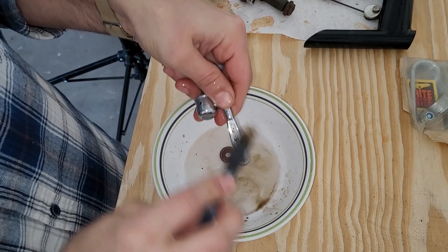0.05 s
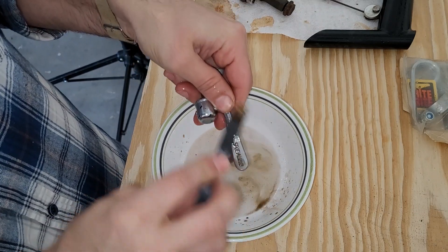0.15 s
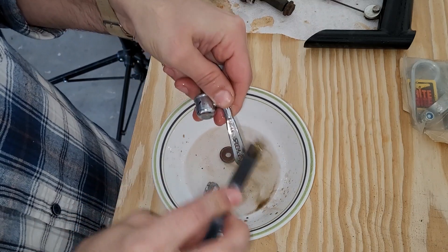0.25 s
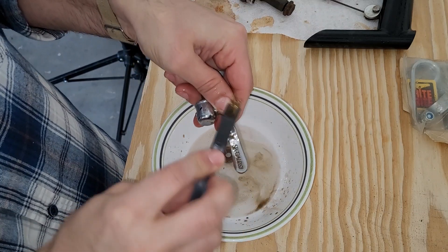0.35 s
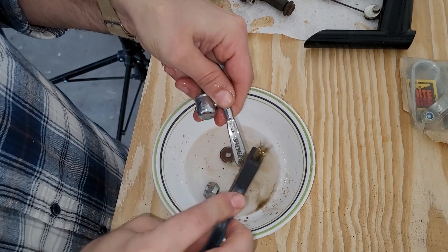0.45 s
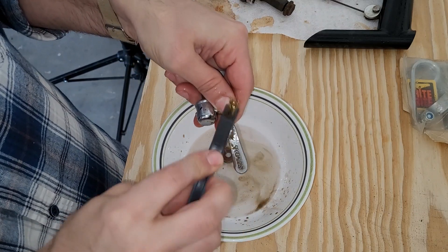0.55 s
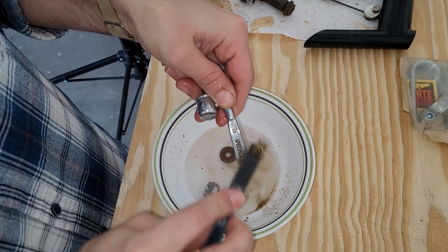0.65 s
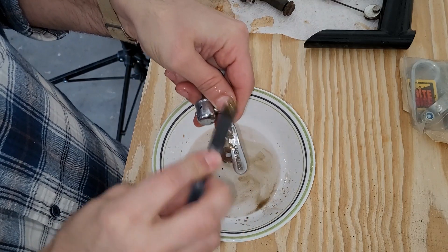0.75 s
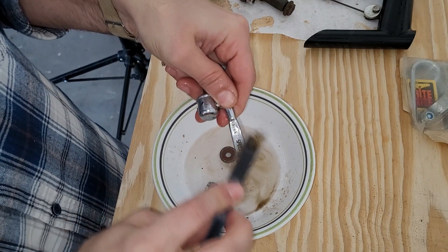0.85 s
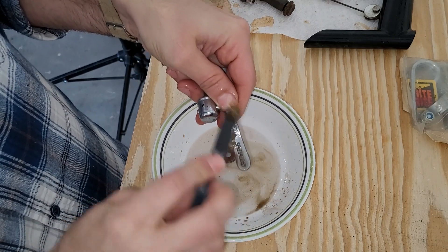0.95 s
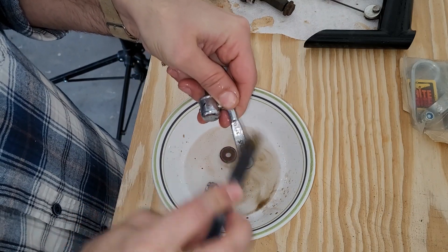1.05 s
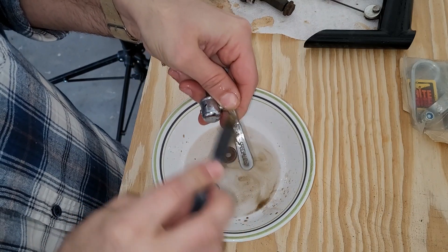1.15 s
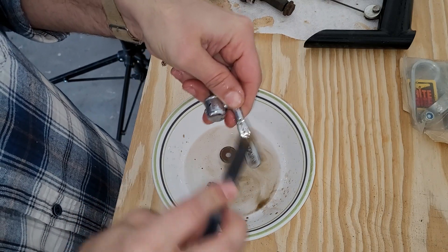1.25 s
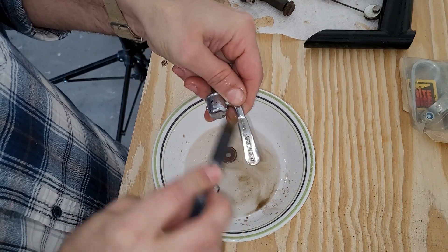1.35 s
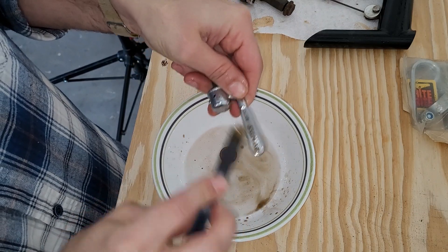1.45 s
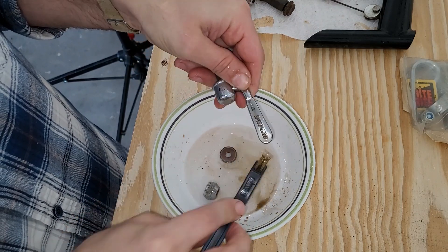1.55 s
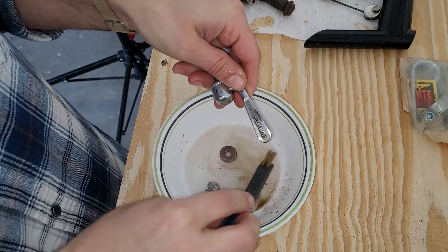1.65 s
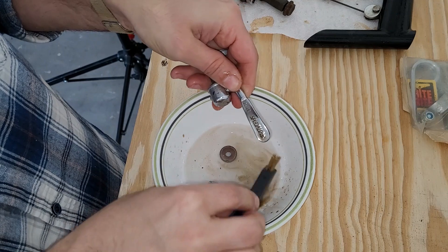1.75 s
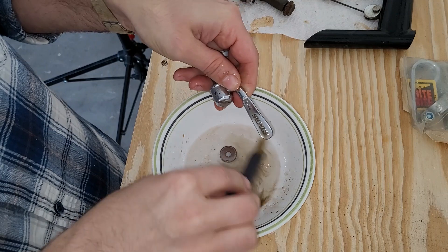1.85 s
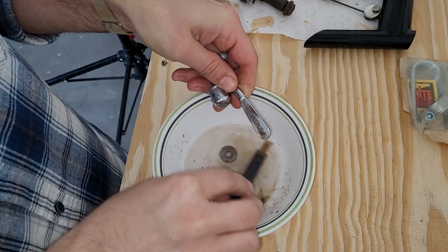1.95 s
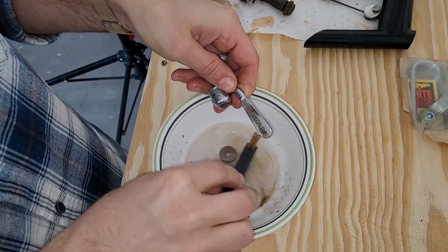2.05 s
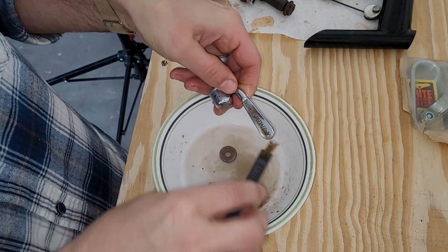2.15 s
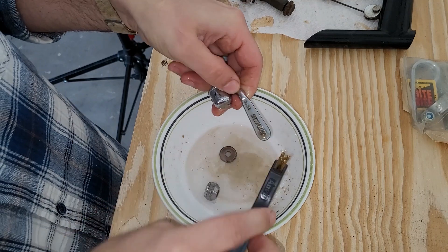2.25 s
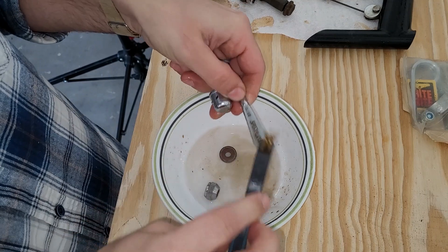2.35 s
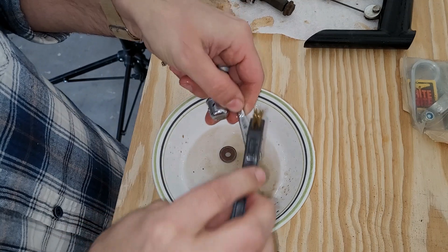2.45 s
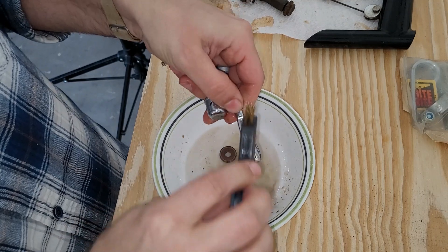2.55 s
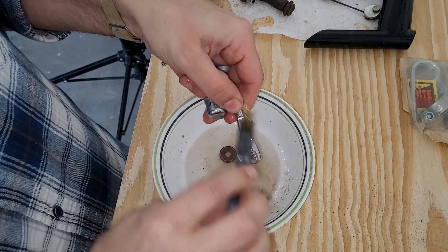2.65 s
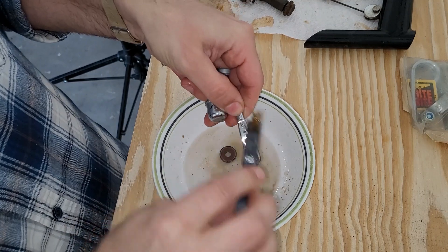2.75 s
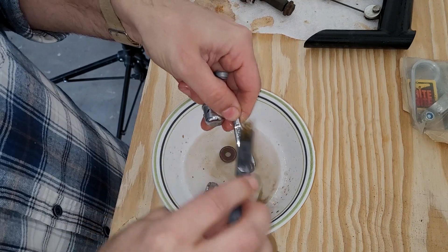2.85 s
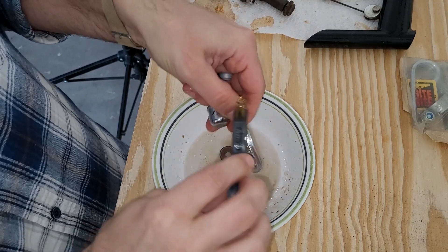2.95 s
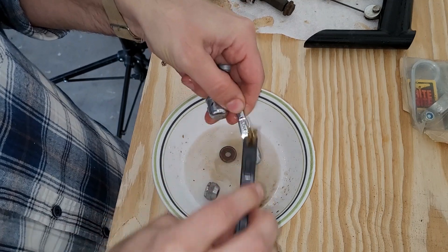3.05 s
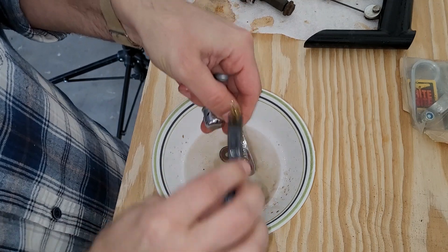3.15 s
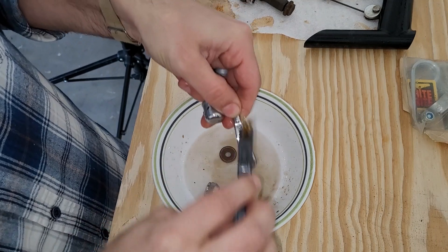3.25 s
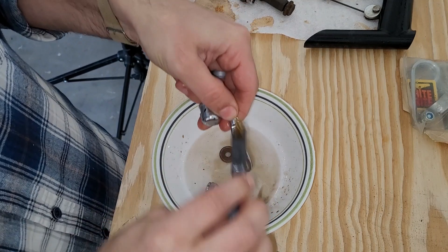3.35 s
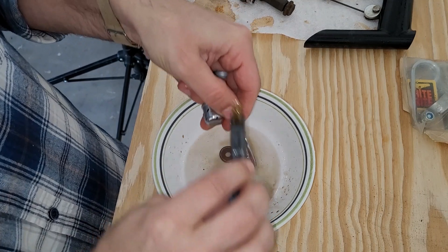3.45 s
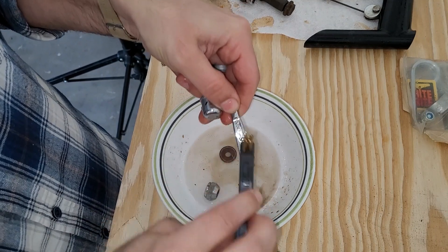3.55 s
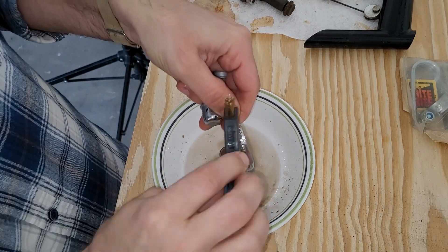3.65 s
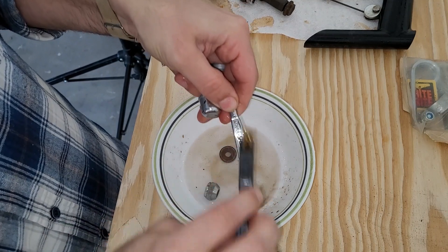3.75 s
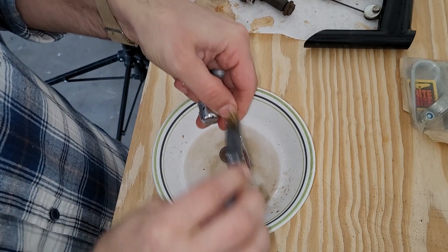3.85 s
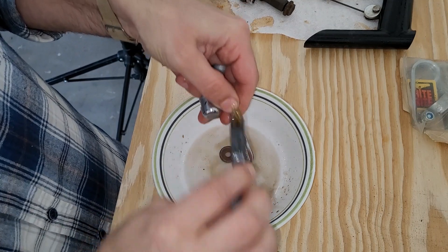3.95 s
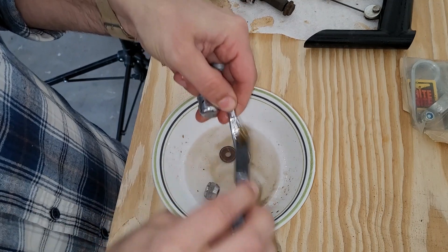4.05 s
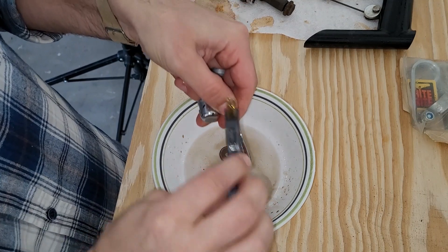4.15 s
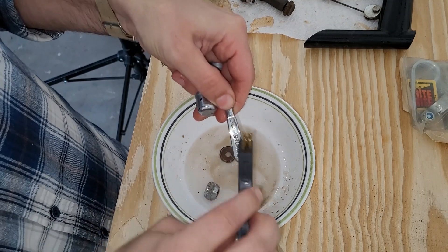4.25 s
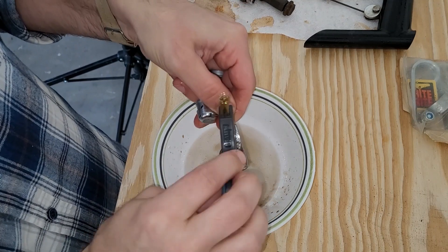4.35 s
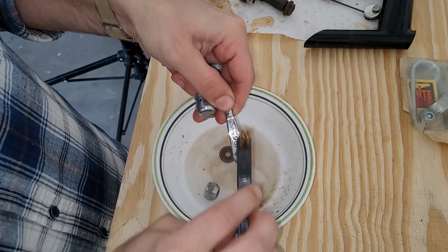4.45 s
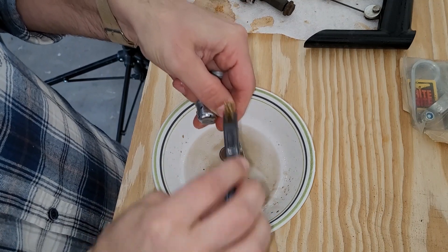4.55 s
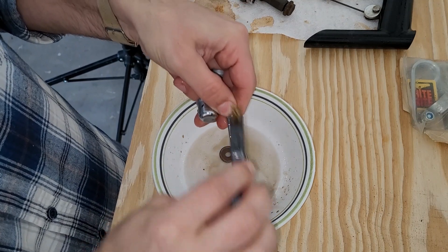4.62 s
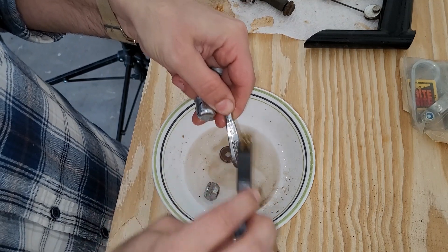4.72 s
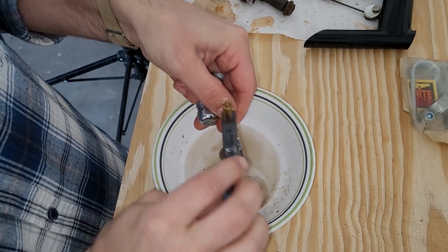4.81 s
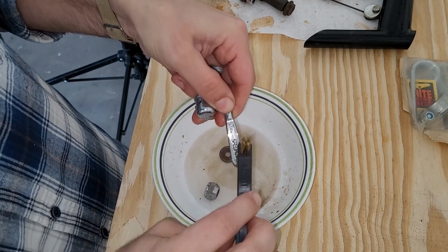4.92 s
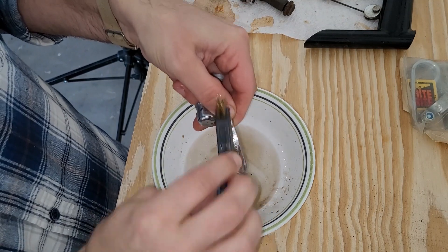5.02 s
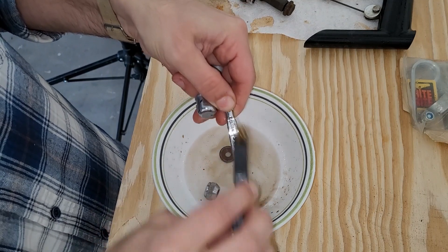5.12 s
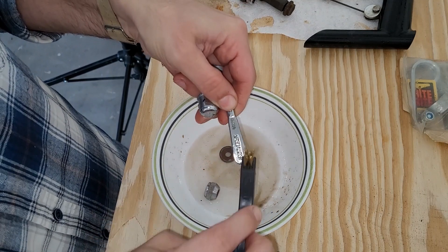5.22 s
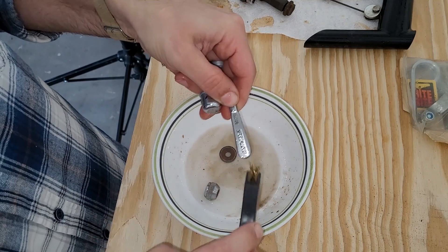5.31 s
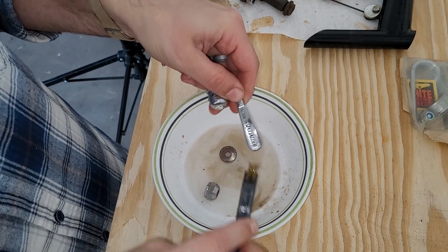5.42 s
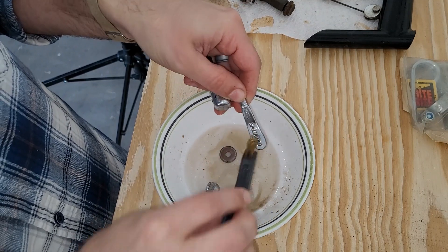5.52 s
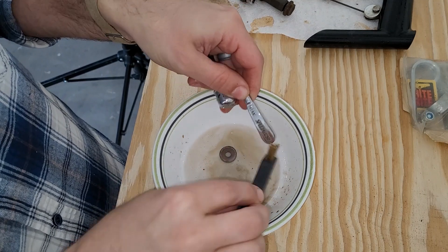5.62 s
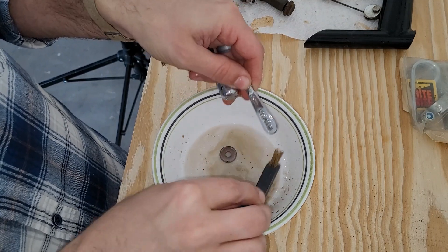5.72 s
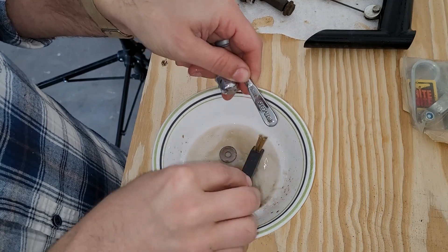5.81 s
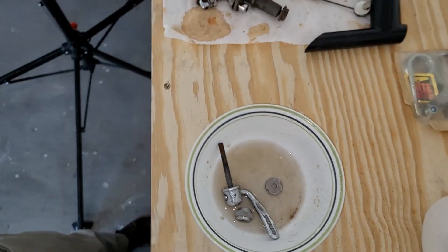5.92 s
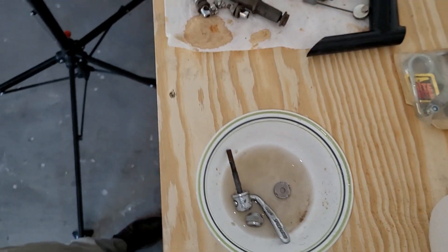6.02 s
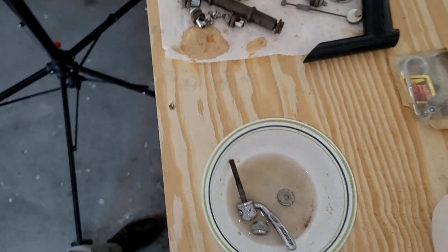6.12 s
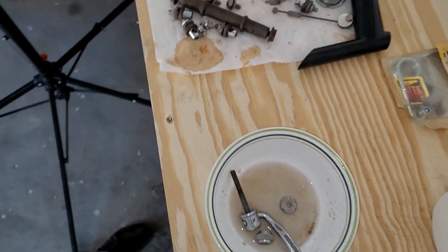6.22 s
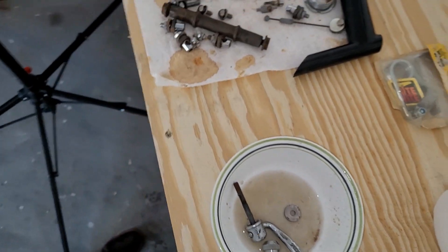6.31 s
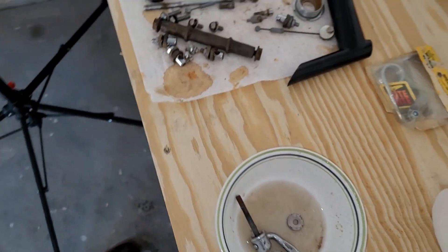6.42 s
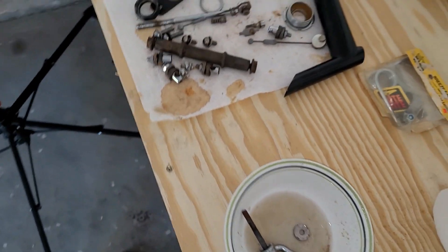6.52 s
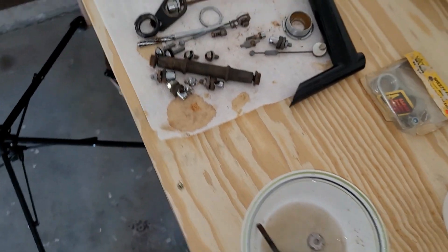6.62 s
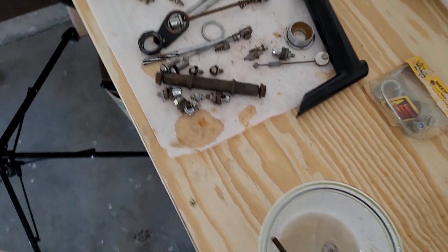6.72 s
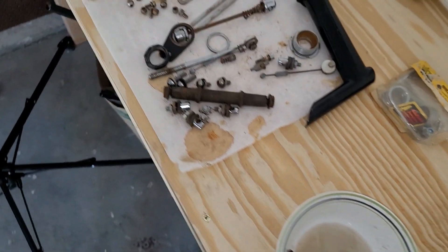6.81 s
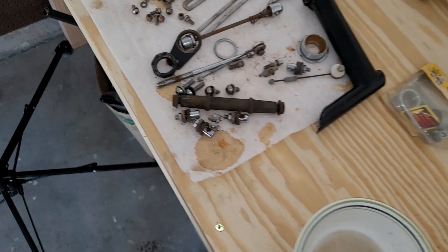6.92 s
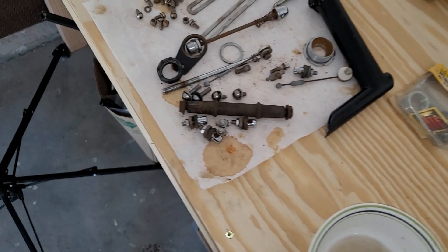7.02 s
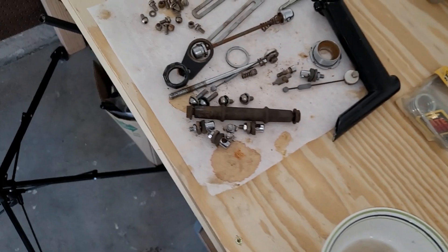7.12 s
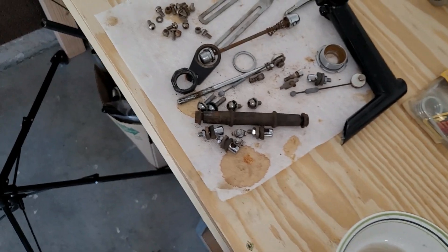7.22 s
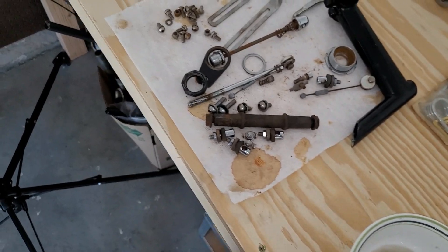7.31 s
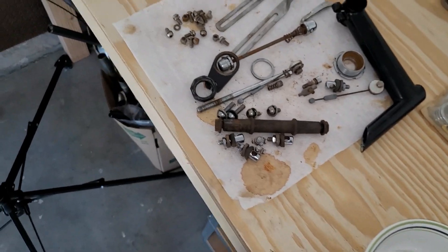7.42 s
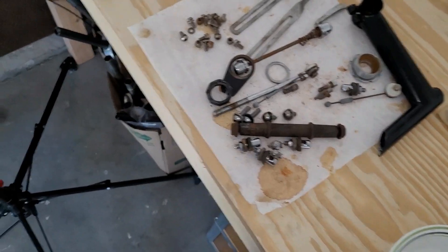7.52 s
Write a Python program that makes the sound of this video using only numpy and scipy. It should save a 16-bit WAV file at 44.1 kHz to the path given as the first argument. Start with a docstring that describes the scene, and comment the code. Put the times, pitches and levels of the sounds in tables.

```python
"""Scrubbing a wet lever over a china bowl

Two microphones close to a wooden workbench: a stiff brush scrubs a wet metal lever, noise grains through modes.
Two runs of quick strokes, with a dip of swishes and ringing china between; now and then the lever sings.
The brush goes down with a knock of ringing modes, a blow on metal clanks further off, a sleeve rustles as
grains of cloth noise. Fan air, shaped noise with wavering tones, runs throughout over a low hum that comes and goes.
"""
import sys
import numpy as np
from scipy import signal
from scipy.fft import rfft, irfft, next_fast_len
from scipy.io import wavfile

SR = 44100
rng = np.random.default_rng(int(sys.argv[2]) if len(sys.argv) > 2 else 0)


def master_out(mix):
    """Clip the mix to full scale and print it as 16-bit PCM to the path in sys.argv[1]."""
    frames = np.transpose(np.atleast_2d(mix))
    ceiling = np.clip(frames, -1, 1)
    pcm = np.round(ceiling * 32767).astype(np.int16)
    wavfile.write(sys.argv[1], SR, pcm)


N = 333835
TIME = np.arange(N) / SR

# All spectra and mode levels are relative; sources set their own loudness.
# fan and room air, spectrum: (frequency [Hz], density [dB])
AIR_SPECTRUM = [(40, -4), (130, -3), (190, -4), (270, -1), (450, 0), (650, -2.5), (900, 0.5), (1300, -11),
                (1800, -23), (2600, -36.5), (5000, -36.5), (16000, -34.5)]
# course of the fan and room air: (time [s], relative level [dB])
AIR_LEVEL = [(0.0, -60.5), (1.03, -60), (2.32, -65), (2.8, -60.5), (5.23, -58.5), (5.78, -60.5),
             (5.9, -64.5), (7.57, -61)]
# tones of the fan: (frequency [Hz], level against the air [dB])
FAN_TONES = [(267, -12), (335, -27), (355, -20.5), (451, -17), (562, -13), (688, -22.5), (1042, -22.5),
             (1125, -22)]
# partials of the low hum: (centre frequency [Hz], mean level [dB])
HUM_PARTIALS = [(69, 0), (138, -11), (213, -8), (284, -14)]
# when the hum is heard: (start [s], end [s], level [dB])
HUM_SPELLS = [(-.1, 0.786, -54.5), (0.777, 1.35, -66), (1.38, 2.0, -59), (5.2, 5.92, -62)]
# trembling of the bench, spectrum: (frequency [Hz], density [dB])
RUMBLE_SPECTRUM = [(20, -28), (30, -18), (46, -2), (62, 2), (75, -3.5), (96, -8.5), (134, -3.5), (175, -22),
                   (250, -42), (420, -90)]
# sleeve and fingers shifting: (time [s], relative level [dB], half length [s], treble [dB])
RUSTLES = [(5.38, -90, .15, 2.5), (5.642, -73.5, 0.027, 9), (6.555, -65, 0.046, 5),
           (6.734, -73, 0.099, 6.5), (6.933, -65.5, 0.1, -8), (7.311, -64.5, 0.018, -10),
           (7.425, -62, 0.034, -13), (7.532, -64.5, 0.046, -19)]
# cloth fibres, spectrum: (frequency [Hz], density [dB])
CLOTH_SPECTRUM = [(1200, -12), (2000, 1), (2600, -7), (3800, -6), (4800, -0.5), (6000, -5), (7700, -2),
                  (12200, -3.5), (16000, -8)]
# brief soft scuff, spectrum: (frequency [Hz], density [dB])
SCUFF_SPECTRUM = [(700, -14), (1500, 5), (2000, 4), (2600, -5), (3250, 5), (3900, -7), (4550, -3),
                  (5300, -9), (16000, -29)]
# modes of the clank across the workshop: (frequency [Hz], level [dB], decay by 60 dB [s])
CLANK_MODES = [(1542, -6, 0.46), (1560, -4, 0.26), (1790, 0, 0.31), (1860, 0, 0.19), (1970, 0, 0.36),
               (3090, 2, 0.26), (3300, -4, 0.29), (3980, -4, .25), (4530, -14, 0.26), (6000, -7, .3)]
# blurred burst of the clank, spectrum: (frequency [Hz], density [dB])
CLANK_SPECTRUM = [(700, -4), (1000, -8), (1300, -2.5), (1750, 3), (2000, 0.5), (2600, -10), (3250, -2.5),
                  (3700, -7.5), (6000, -9.5), (9000, -13.5), (16000, -21)]
# handle bouncing on the bench, then soft nudges: (time [s], click level [dB])
KNOCKS = [(5.7935, -29), (5.8005, -25), (5.8155, -30), (5.8272, -32.5), (5.842, -41), (5.868, -43),
          (5.885, -45), (5.9237, -43), (6.38, -46.5), (6.43, -44), (6.448, -46)]
# modes of the bench: (frequency [Hz], level [dB], decay by 60 dB [s])
BENCH_MODES = [(113, -15, 0.25), (229, -19, .06), (283, -8, .055), (342, -1, .026), (455, -17, .12),
               (600, -17, .03), (824, -18, .07)]
# handle clattering as it settles: (time [s], click level [dB])
CLATTER = [(5.795, -52), (5.808, -50), (5.8184, -49), (5.833, -49), (5.9237, -65)]
# modes of the handle: (frequency [Hz], level [dB], decay by 60 dB [s])
HANDLE_MODES = [(2120, -11, 0.028), (3510, -7.5, .05), (3770, -8, .04), (4650, -10, .03), (6500, -2, .02),
                (8700, 1, .015)]
# wet bristles swept through the bowl: (time [s], swish [dB], bowl rumble [dB], half length of the fall [s])
SWEEPS = [(1.826, -67.5, -53.5, 0.019), (1.899, -50.5, -55.5, 0.026), (2.005, -53, -49, 0.023),
          (2.071, -49, -45, 0.017)]
# swish of wet bristles, spectrum: (frequency [Hz], density [dB])
SWISH_SPECTRUM = [(880, 1), (1500, -3), (2160, -6), (2800, -20), (3690, -0.5), (5170, -5), (6000, -2),
                  (7170, -1.5), (8830, 1.5), (9560, -6.5), (12000, -2), (13400, -5), (16000, -4)]
# dull body of the bowl, and of the bench as the brush lands, spectrum: (frequency [Hz], density [dB])
BODY_SPECTRUM = [(120, -14), (220, 0.5), (290, 6), (380, -1), (470, -6), (700, -13), (1500, -30)]
# modes of the china: (frequency [Hz], width [Hz], level [dB])
CHINA_MODES = [(1775, 18, -21), (4300, 40, -18), (9000, 220, -8.5), (10200, 100, -10), (10780, 130, -5.5),
               (12250, 260, -5), (15700, 190, -15)]
# tufts snapping over an edge: (time [s], relative level [dB])
SNAPS = [(.078, -44), (.1624, -41.5), (.3774, -43), (.524, -42), (1.238, -43.5), (1.38, -41), (1.868, -52),
         (1.886, -51), (1.918, -53), (2.0552, -44), (2.669, -41), (2.9834, -46.5), (3.14, -41),
         (3.608, -41), (4.315, -40), (4.534, -46), (4.996, -42), (5.658, -51.5)]
# bristles catching so that the lever sings: (time [s], relative level [dB], half length [s], frequency [Hz])
SQUEALS = [(1.11, -60, .035, 2720), (1.17, -74, .02, 2525), (1.68, -87, .05, 3120), (1.66, -89, .02, 4900),
           (3.766, -56, 0.021, 2737), (5.28, -74.5, .05, 3164), (5.532, -84, .05, 3210)]
# bristles on the lever, spectrum: (frequency [Hz], density [dB])
BRISTLE_SPECTRUM = [(900, -19), (1700, -39), (2400, -32), (3000, -32), (3500, -37), (4200, -5.5),
                    (5200, -3.5), (7200, -0.5), (9000, -3), (11400, 1.5), (14000, 1), (15500, 4),
                    (16500, 9.5)]
# modes of the lever: (frequency [Hz], width [Hz], level [dB])
LEVER_MODES = [(1484, 170, -38), (2120, 38, -31), (2543, 35, -38), (2735, 26, -31), (2910, 36, -35),
               (3168, 55, -33), (3890, 53, -28), (4920, 73, -25.5), (5390, 120, -22), (6570, 110, -36),
               (6900, 42, -27.5), (7210, 150, -23.5), (8120, 64, -21), (11540, 300, -21.5),
               (12050, 100, -21), (15600, 300, -19)]
# how freely the lever rings under the changing grip: (time [s], level [dB])
GRIP = [(0, -4), (1.3, 4), (2.5, 0.5)]
# brush on the lever: (touches [s], leaves [s])
BOUTS = [(-0.19, 1.41), (2.6, 5.354)]
# pushes, the bristles break loose at once: (start [s], end [s], relative level [dB], brightness [dB])
PUSHES = [(0.079, 0.137, -35, 2.5), (0.305, 0.356, -37.0, 3.5), (0.524, 0.578, -37, -0.5),
          (0.733, 0.79, -37, 1), (0.939, 0.996, -38.0, 2.5), (1.147, 1.201, -40, 4),
          (1.358, 1.388, -44.5, 1), (2.492, 2.553, -55, -3), (2.67, 2.728, -41.5, 1),
          (2.885, 2.945, -41.5, -1.5), (3.146, 3.192, -36.5, 4), (3.369, 3.436, -38, 1),
          (3.607, 3.667, -37.5, 0), (3.851, 3.91, -36, 2), (4.085, 4.149, -35, 4), (4.317, 4.371, -35, 2.0),
          (4.539, 4.598, -35.0, 0.5), (4.771, 4.827, -35.5, -0.5), (4.991, 5.052, -34.5, 0.5)]
# pulls, the bristles ease into the slide: (start [s], end [s], relative level [dB], brightness [dB])
PULLS = [(-0.03, 0.028, -36.5, 8.5), (0.215, 0.25, -36.5, 7), (0.433, 0.469, -36, 6),
         (0.662, 0.678, -34, 10), (0.859, 0.901, -39.5, 7), (1.058, 1.109, -38, 5), (1.259, 1.304, -41, 4),
         (2.589, 2.635, -43, 2.5), (2.767, 2.834, -44.0, 1.5), (3.036, 3.097, -39.5, 5.5),
         (3.266, 3.327, -37, 3), (3.499, 3.566, -37.5, 3.5), (3.741, 3.804, -37, 2.5), (3.99, 4.04, -37, 2),
         (4.213, 4.265, -37, 1.0), (4.435, 4.489, -35.5, 1.5), (4.657, 4.719, -36.5, 2.5),
         (4.886, 4.944, -36, 3), (5.111, 5.181, -36, 1.5)]
# likeness of the two microphones: (frequency [Hz], correlation [-1 to 1])
LIKENESS = [(30, 0.99), (120, 0.75), (280, 0.71), (500, 0.44), (900, -0.25), (2300, -0.17), (5000, -0.21),
            (16000, -0.1)]
# balance of the two microphones: (frequency [Hz], left minus right [dB])
BALANCE = [(40, -6.5), (150, 1), (1000, 1), (2300, 3.5), (3200, 3), (4300, 4.5), (5600, 0), (7500, -1),
           (8700, 3.5), (10000, 2.5), (11700, 3), (16000, 1.5)]

CUTOFF_HZ = 15750
DIP_AT, DIP_HALF_S, DIP_DB = 5.969, .013, -24   # the level dips briefly as the work ends


def from_db(db):
    """Decibels to gain."""
    return 10 ** (np.asarray(db) / 20)


def rms_one(x):
    """Scale to unit power."""
    return x / np.sqrt(np.mean(x ** 2) + 1e-20)


def at_hz(points, hz):
    """Read a spectrum on a log-frequency axis."""
    frequency, value = np.transpose(points)
    return np.interp(np.log(hz + 1e-3), np.log(frequency), value)


def rfft_hz(size):
    """Frequency of each bin of a spectrum."""
    return np.arange(size // 2 + 1) * SR / size


def samples(start, end):
    """The stretch of samples between two times [s]."""
    return slice(max(0, int(start * SR)), max(0, int(end * SR)))


def drift(rate):
    """Smooth chance with rms 1, changing about rate times a second."""
    knots = rng.standard_normal(N)
    return rms_one(np.interp(TIME * min(rate, SR / 2), np.arange(N), knots))


def white():
    """Two unrelated noises."""
    return rng.standard_normal((2, N))


def colour(pair, spectrum):
    """Give two unrelated signals a spectrum and spread them over the two microphones; rms 1."""
    size = next_fast_len(N)
    hz = rfft_hz(size)
    mid, side = rfft(pair, size) * from_db(at_hz(spectrum, hz)) * (hz < CUTOFF_HZ) * (hz > 10)
    alike = np.clip(at_hz(LIKENESS, hz), -1, 1)
    sign = np.array([[1], [-1]])
    microphones = np.sqrt(1 + alike) * mid + sign * np.sqrt(1 - alike) * side
    balance = from_db(sign * at_hz(BALANCE, hz) / 2)
    return rms_one(irfft(microphones * balance, size)[:, :N])


def grains(per_s, spread_db):
    """Tiny slips of uneven size at random moments; each reaches the two sides differently."""
    born = rng.random(N) < per_s / SR
    size_db = spread_db * np.minimum(rng.exponential(1, N), 4)
    return rms_one(born * from_db(size_db) * white())


def resonate(x, hz, width_hz):
    """A resonance with gain 1 on top."""
    r = np.exp(-np.pi * width_hz / SR)
    feedback = [1, -2 * r * np.cos(2 * np.pi * hz / SR), r * r]
    return signal.lfilter(np.array([1, 0, -1]) * (1 - r * r) / 2, feedback, x)


def narrow_noise(hz, width_hz, skirt_hz):
    """A rough tone: noise through two resonances at one pitch; rms 1."""
    return rms_one(resonate(resonate(white(), hz, width_hz), hz, skirt_hz))


def split_treble(x, split_hz):
    """Part a sound into its dull share and the treble that is left."""
    dull = signal.sosfiltfilt(signal.butter(2, split_hz, fs=SR, output="sos"), x)
    return dull, x - dull


def ring(clicks, modes):
    """A unit click sets each mode ringing at its own height."""
    out = 0
    for hz, db, t60 in modes:
        r, w = from_db(-60 / (t60 * SR)), 2 * np.pi * hz / SR
        feedback = [1, -2 * r * np.cos(w), r * r]
        # the tiny offset keeps the filter clear of denormal numbers
        out = out + from_db(db) * signal.lfilter([0, np.sin(w)], feedback, clicks + 1e-18)
    return out


def sing(force, modes, wander_db, shift_hz, move_rate=14):
    """Modes driven by a rubbing force; each mode wavers at random in pitch and strength."""
    out = 0
    for hz, width, db in modes:
        coupling = from_db(wander_db * np.minimum(drift(move_rate), 1))
        tone = from_db(db) * np.sqrt(SR / np.pi / width) * resonate(force * coupling, hz, width)
        bent = TIME + shift_hz / hz / move_rate / np.sqrt(2) * drift(move_rate)
        out = out + np.array([np.interp(bent, TIME, side) for side in tone])
    return out


def swell(s, rise, fall, squareness=2.46):
    """Gain of one push of the hand: it speeds up, peaks at s and slows down."""
    out, near = np.zeros(N), samples(s - 4 * rise, s + 4 * fall)
    lag = TIME[near] - s
    out[near] = np.exp(-np.abs(lag / np.where(lag < 0, rise, fall)) ** squareness / 2)
    return out


def burst(s, rise, t60):
    """Gain that jumps up at s and dies away."""
    age = np.maximum(TIME - s, 0)
    return (1 - np.exp(-age / rise)) * np.exp(-np.minimum(np.log(1000) * age / t60, 50))


def spell(start, end, fade_s=0.052):
    """Gain that fades in at start and out at end."""
    return np.clip(np.minimum(TIME - start, end - TIME) / fade_s + .5, 0, 1)


def level_curve(rows):
    """A curve of (time [s], level [dB]) as a gain."""
    return from_db(np.interp(TIME, *np.transpose(rows)))


def clicks_at(rows):
    """One click for each (time [s], level [dB])."""
    clicks = np.zeros(N)
    for s, db in rows:
        clicks[round(s * SR)] = from_db(db)
    return clicks


def flicker(x, patch_db=1.8, patch_rate=70, count=7):
    """Bands of the hiss flicker independently, so the colour shifts within a stroke."""
    size = next_fast_len(N)
    spectrum = rfft(x, size)
    place = np.interp(rfft_hz(size), [4000, 15500], [0, count - 1])
    out = 0
    for k in range(count):   # overlapping bands
        band = irfft(spectrum * np.maximum(1 - np.abs(place - k), 0), size)[:, :N]
        out = out + band * from_db(patch_db * drift(patch_rate))
    return rms_one(out)


def strokes():
    """Each stroke as (middle [s], gain through time, brightness [dB]): quick rise, hold, release."""
    release_s = .009
    for rows, attack_s in ((PUSHES, .006), (PULLS, .0085)):
        for start, end, db, bright_db in rows:
            gain, near = np.zeros(N), samples(start - .1, end + .1)
            rise = 1 + np.exp((start - TIME[near]) / attack_s)
            release = 1 + np.exp((TIME[near] - end) / release_s)
            gain[near] = from_db(db) / rise / release
            yield (start + end) / 2, gain, bright_db


def workshop(x, t60=0.43, treble_t60=0.26, split_hz=7000):
    """Diffuse room tail, other on each side; the treble dies sooner."""
    age = TIME[:SR]
    noise = rng.standard_normal((2, SR))
    dull = signal.sosfilt(signal.butter(2, split_hz, fs=SR, output="sos"), noise)
    tail = dull * 1000 ** (-age / t60) + (noise - dull) * 1000 ** (-age / treble_t60)
    tail = tail * (age > .005)
    return signal.fftconvolve(x, tail / np.sqrt(np.sum(tail ** 2) / 2), axes=1)[:, :N]


def background(air_db=4.5, tone_width_hz=8, hum_waver_hz=1.184, lift_db=1.0):
    """Fan air with wavering tones, quieter just after the work ends, then slowly rising again, and a low hum."""
    tones = sum(from_db(db) * narrow_noise(hz, tone_width_hz, 120) for hz, db in FAN_TONES)
    air_gain = level_curve(AIR_LEVEL) * from_db(air_db + lift_db * (TIME > DIP_AT))
    air = air_gain * (colour(white(), AIR_SPECTRUM) + tones)
    hum = 0
    for hz, db in HUM_PARTIALS:
        level = from_db(db + 2 * drift(6))
        hum = hum + level * np.sin(2 * np.pi * np.cumsum(hz + hum_waver_hz * drift(6)) / SR)
    return air + hum * sum(from_db(db) * spell(start, end) for start, end, db in HUM_SPELLS)


def tremble(re_stroke_db=-21.5, leaning_db=-63, still_db=-75.5, press_db=-54):
    """The bench rumbles under the working arms, more the harder they scrub, and swells as they once press down."""
    strength = level_curve(sorted((start, db) for start, _, db, _ in [*PUSHES, *PULLS]))
    effort = strength * sum(spell(touch, leave) for touch, leave in BOUTS)
    leaning = from_db(leaning_db) * (TIME < DIP_AT)
    press = from_db(press_db) * swell(3.71, 0.2, 0.2)
    power = (from_db(re_stroke_db) * effort) ** 2 + leaning ** 2 + from_db(still_db) ** 2 + press ** 2
    return np.sqrt(power) * colour(white(), RUMBLE_SPECTRUM)


def rustle(trim_db=1, split_hz=8000, scuff_db=-61):
    """Cloth fibres slide softly, with less treble in the later moves, and catch once."""
    dull, treble = split_treble(colour(grains(17000, 1.7), CLOTH_SPECTRUM), split_hz)
    slide = 0
    for s, db, half, treble_db in RUSTLES:
        move = from_db(db) * swell(s, half, half, squareness=1.67)
        slide = slide + move * (dull + from_db(treble_db) * treble)
    catch = swell(7.188, .01, .016, squareness=1.4)
    return from_db(trim_db) * slide + from_db(scuff_db) * catch * colour(white(), SCUFF_SPECTRUM)


def clank(at=6.231, level_db=-40, t60=0.18, modes_db=-17, tail_db=-11, tail_t60=0.92):
    """A far blow on metal, blurred by the room into a burst with a few lasting tones."""
    build_up_s = .009
    fade = burst(at, build_up_s, t60) + from_db(tail_db) * burst(at, 2 * build_up_s, tail_t60)
    blow = white() * burst(at, 0.0027, 0.065)
    tones = ring(blow / np.sqrt(np.sum(blow ** 2) / 2), CLANK_MODES)
    return from_db(level_db) * (fade * colour(white(), CLANK_SPECTRUM) + from_db(modes_db) * tones)


def put_down(low_hz=170, contact_hz=750):
    """The handle bounces dully on the bench and clatters to rest; later the bench is nudged."""
    contact = signal.butter(2, [low_hz, contact_hz], "band", fs=SR, output="sos")
    push = signal.sosfilt(contact, clicks_at(KNOCKS))
    return ring(clicks_at(CLATTER), HANDLE_MODES) - ring(push, BENCH_MODES)


def splay(at=5.822, level_db=-49, slide_db=-52, slide_t60=0.74, shudder_db=-48, shudder_t60=.13, drag_db=-47):
    """From the first knock on, the bristles splay and slide to rest while the bench shudders."""
    landing = KNOCKS[0][0]
    slide = burst(landing, .002, slide_t60) * (TIME < DIP_AT)
    spread = from_db(level_db) * swell(at, .02, 0.018) * (TIME > landing)
    swish = spread + from_db(slide_db) * slide
    shudder = from_db(shudder_db) * burst(landing, .002, shudder_t60) + from_db(drag_db) * slide
    return swish * colour(grains(7000, 1.7), SWISH_SPECTRUM) + shudder * colour(white(), BODY_SPECTRUM)


def sweeps(china_db=-2.5, wander_db=5.5, shift_hz=60, bowl_db=-3, rise_ratio=1.42):
    """Wet bristles swish and ring the china; the drag passes on to the bowl's body."""
    speed = sum(from_db(db) * swell(s, rise_ratio * half, half) for s, db, _, half in SWEEPS)
    drag = sum(from_db(db) * swell(s, rise_ratio * half, half) for s, _, db, half in SWEEPS)
    slips = grains(6500, 1.8) * from_db(1.2 * drift(150))
    first_touch = from_db(-60) * burst(1.751, 0.00091, 0.45)   # the bristles meet the china
    china = sing((speed + first_touch) * slips, CHINA_MODES, wander_db, shift_hz, move_rate=40)
    swish = speed * flicker(colour(slips, SWISH_SPECTRUM))
    return swish + from_db(china_db) * china + from_db(bowl_db) * drag * colour(white(), BODY_SPECTRUM)


def snaps(trim_db=2, t60=0.051):
    """A bent tuft springs free all at once."""
    force = sum(from_db(db) * burst(s, 0.00032, t60) for s, db in SNAPS)
    return from_db(trim_db) * force * colour(grains(12000, 2.2), BRISTLE_SPECTRUM)


def squeak(at=5.28, length_s=.19, start_hz=15500, fall_hz=1600, level_db=-82, waver_hz=60):
    """Wet bristles slide off the tip with a thin tone that sags ever faster."""
    along = np.clip((TIME - at) / length_s, 0, 1)
    hz = start_hz - fall_hz * along ** 3 + waver_hz * drift(300)
    return from_db(level_db) * spell(at, at + length_s) * np.sin(2 * np.pi * np.cumsum(hz) / SR)


def squeals(waver_hz=11, trim_db=1, ring_db=-1, ring_t60=.55, rough=.25, rough_hz=70, shake_db=1.3, pan_db=2.5):
    """Stick and slip lock on to one mode of the lever for a moment, a thin rough tone, and the lever rings on."""
    out, waver = 0, waver_hz * drift(60)
    for s, db, half, hz in SQUEALS:
        tone = np.sqrt(2) * np.sin(2 * np.pi * np.cumsum(hz + waver) / SR)
        chatter = narrow_noise(hz, rough_hz, 2 * rough_hz)
        push = swell(s, half, half) + from_db(ring_db) * burst(s, half, ring_t60)
        out = out + from_db(db + trim_db) * push * rms_one(tone + rough * chatter)
    return out * from_db(shake_db * drift(50)) * from_db([[pan_db], [-pan_db]])   # louder on the left


def bristle_tones(level_db=-16, width_hz=70, low_hz=4500, high_hz=15500, scatter_s=.02, half_s=0.016, count=7):
    """In every stroke a few bent bristles ring briefly, each at its own moment and pitch."""
    out = np.zeros((2, N))
    for s, gain, _ in strokes():
        near = samples(s - .1, s + .1)
        for hz in low_hz * (high_hz / low_hz) ** rng.random(count):
            moment = swell(s + scatter_s * rng.normal(), half_s, half_s)
            push = from_db(level_db) * gain[near] * moment[near]
            slips = rng.standard_normal((2, SR // 4))[:, :len(push)]
            out[:, near] += push * rms_one(resonate(slips, hz, width_hz))
    return out


def bowl_echo(x, lag_s=0.001106, travel_s=.00008, echo_db=-10):
    """The bowl throws the sound back; the path drifts with the hand, so the colour keeps shifting."""
    echo_time = TIME - lag_s - travel_s * drift(6)
    echo = np.array([np.interp(echo_time, TIME, side) for side in x])
    return (x + from_db(echo_db) * echo) / np.sqrt(1 + from_db(echo_db) ** 2)


def turning(lag_s=0.069, half_s=0.036, re_push_db=-11.5):
    """Power of the bent bristles creeping over after each push."""
    turns = sum((from_db(db + re_push_db) * swell(end + lag_s, half_s, half_s)) ** 2 for _, end, db, _ in PUSHES)
    return turns * sum(spell(touch, leave) for touch, leave in BOUTS) ** 2


def scrubbing(rub_db=0.54, lever_db=-1, wander_db=6, shift_hz=45, split_hz=8500, body_loss=1.33, hiss_gain=0.52):
    """Each stroke drags thousands of bristle tips over the metal; their uneven slips hiss and excite the lever."""
    slide_off = from_db(-47.5) * swell(5.2, 0.032, 0.032, squareness=1.65)   # the last pull leaves the tip
    low_power = high_power = turning() + slide_off ** 2
    for _, gain, bright_db in strokes():   # a brighter stroke trades body for hiss
        low_power = low_power + gain ** 2 * from_db(-body_loss * bright_db)
        high_power = high_power + gain ** 2 * from_db(hiss_gain * bright_db)
    slips = grains(20000, 1.2) * from_db(1.0 * drift(700) + .5 * drift(110))
    body, hiss = split_treble(flicker(colour(slips, BRISTLE_SPECTRUM)), split_hz)
    rub = body * np.sqrt(low_power) + hiss * np.sqrt(high_power)
    lever = sing(slips * np.sqrt(low_power) * level_curve(GRIP), LEVER_MODES, wander_db, shift_hz)
    return bowl_echo(from_db(rub_db) * rub + from_db(lever_db) * lever + bristle_tones())


def scene(room_db=-16):
    """Close work at the bench with a little room around it."""
    near = put_down() + splay() + sweeps() + snaps() + squeak() + squeals() + scrubbing()
    return background() + tremble() + rustle() + clank() + from_db(room_db) * workshop(near) + near


def record(dry, hollow_hz=8650, hollow_width_hz=1100, hollow_depth=0.53):
    """The right microphone has a hollow in its treble; the level dips once; the top is cut steeply."""
    left, right = dry
    right = right - hollow_depth * resonate(right, hollow_hz, hollow_width_hz)
    dip = from_db(DIP_DB * swell(DIP_AT, DIP_HALF_S, DIP_HALF_S, squareness=1.93))
    top_cut = signal.ellip(12, .1, 80, CUTOFF_HZ, fs=SR, output="sos")
    return signal.sosfilt(top_cut, np.array([left, right]) * dip)


dry = scene()
out = record(dry)
master_out(out)
```